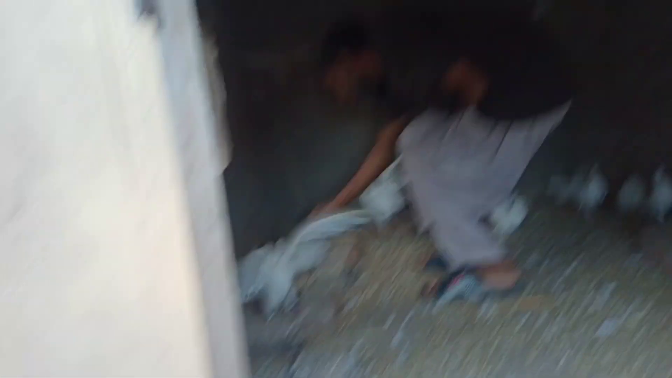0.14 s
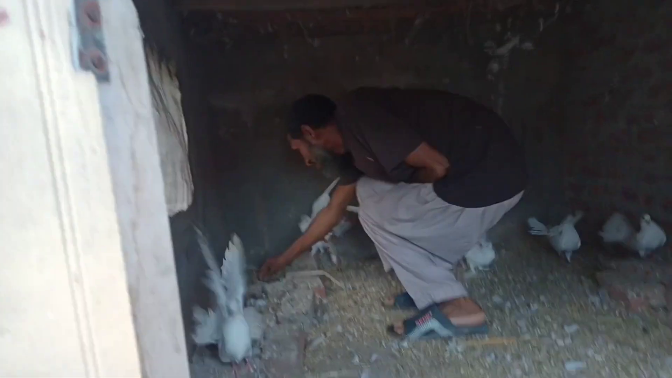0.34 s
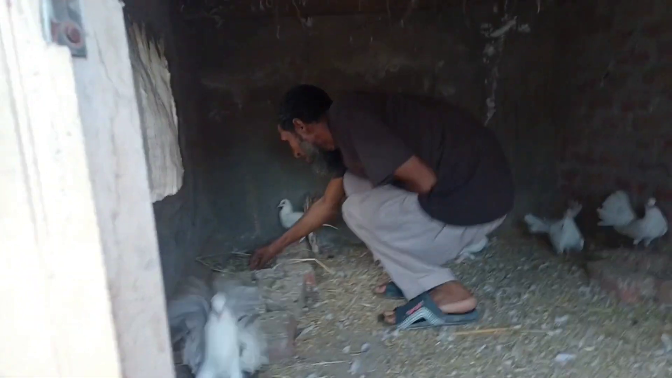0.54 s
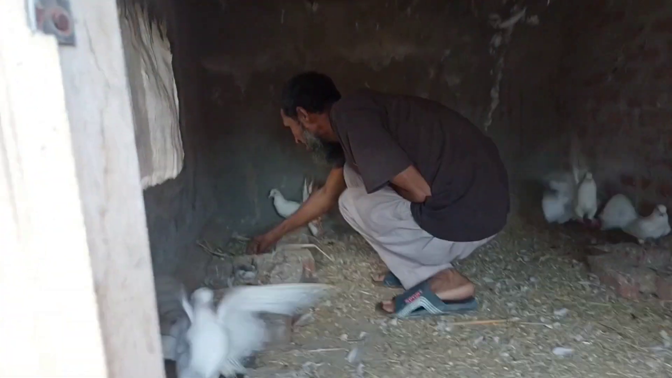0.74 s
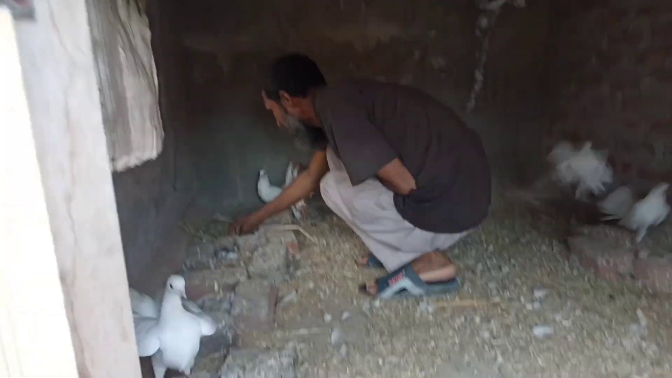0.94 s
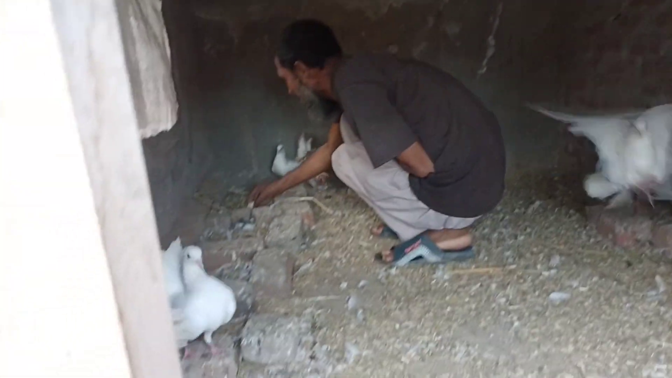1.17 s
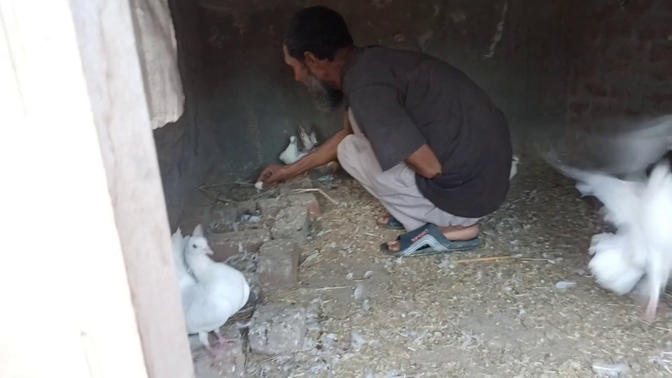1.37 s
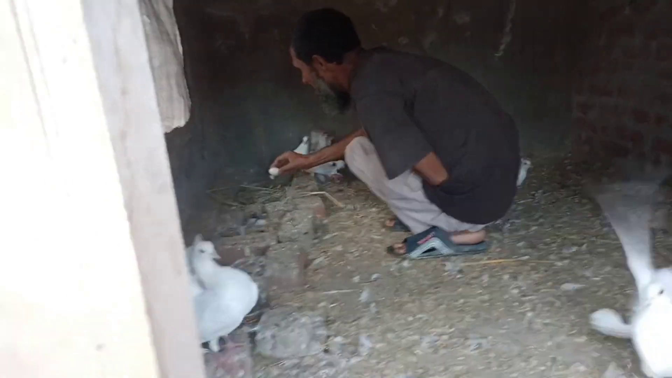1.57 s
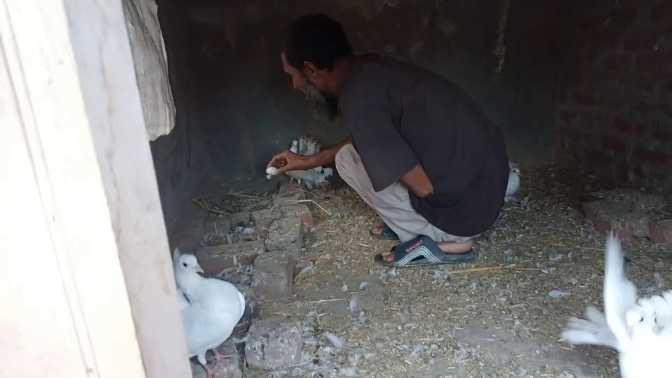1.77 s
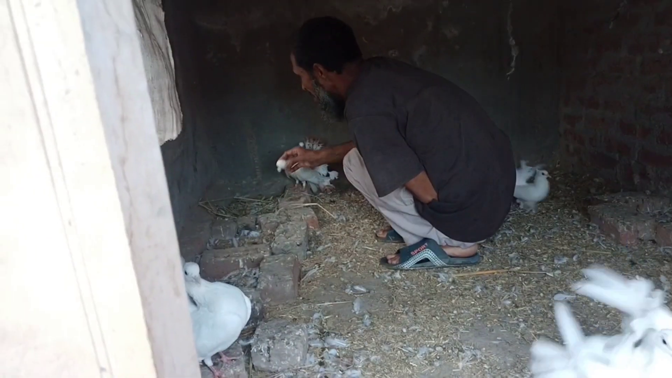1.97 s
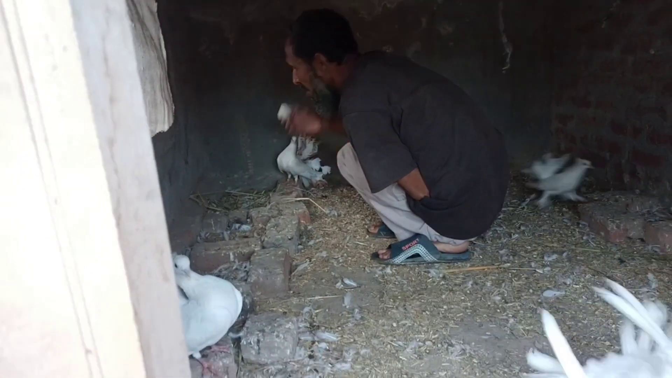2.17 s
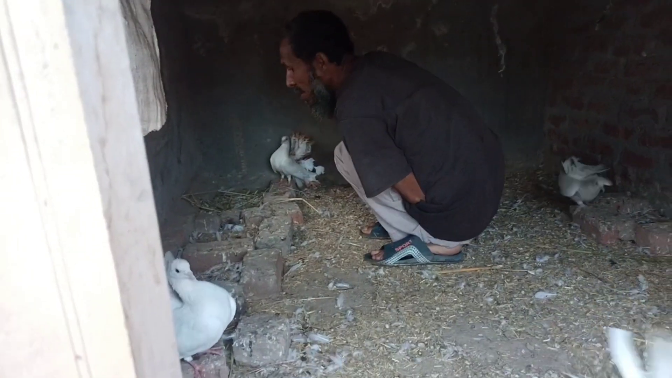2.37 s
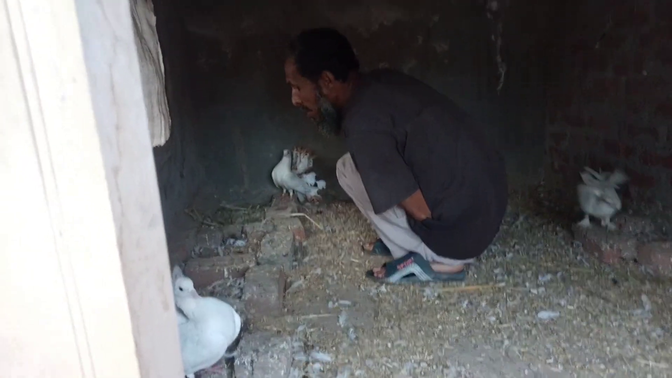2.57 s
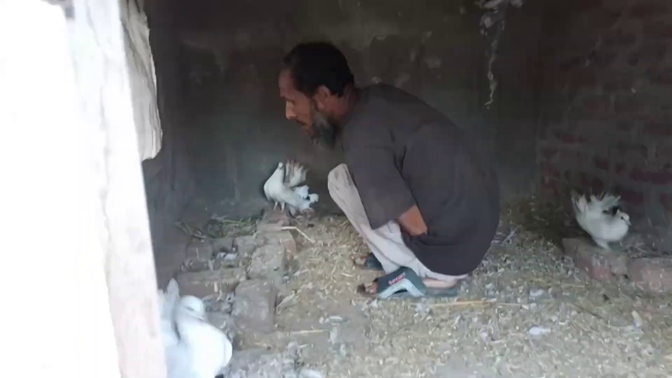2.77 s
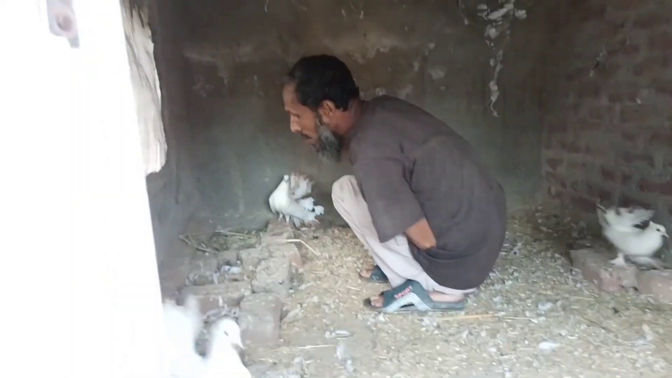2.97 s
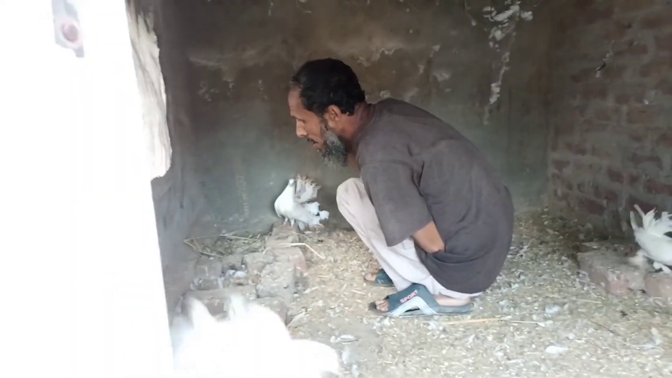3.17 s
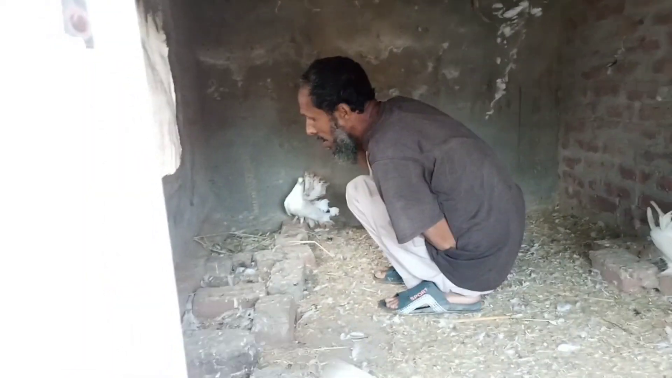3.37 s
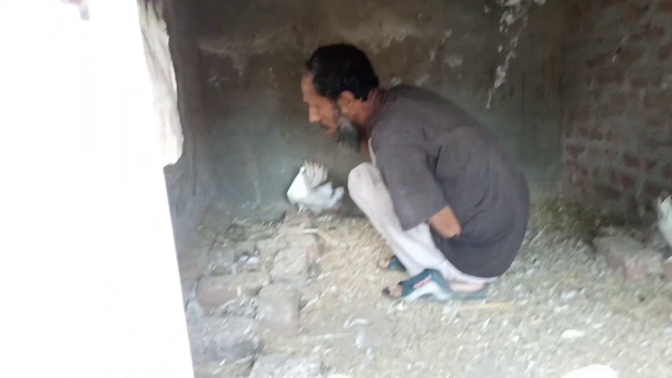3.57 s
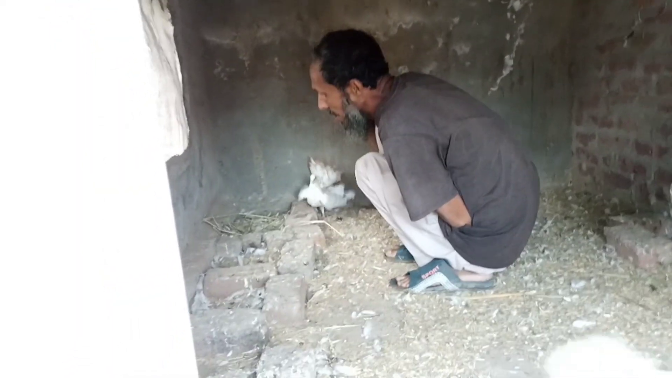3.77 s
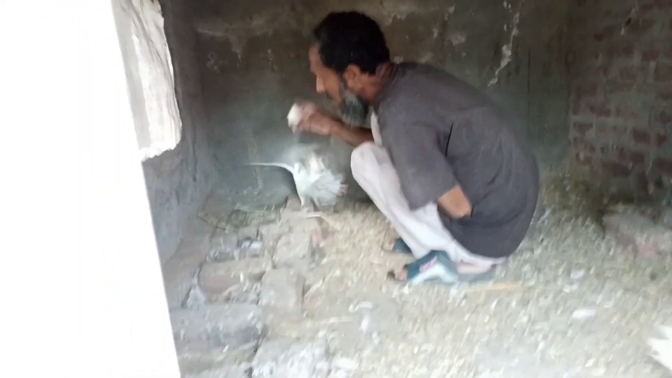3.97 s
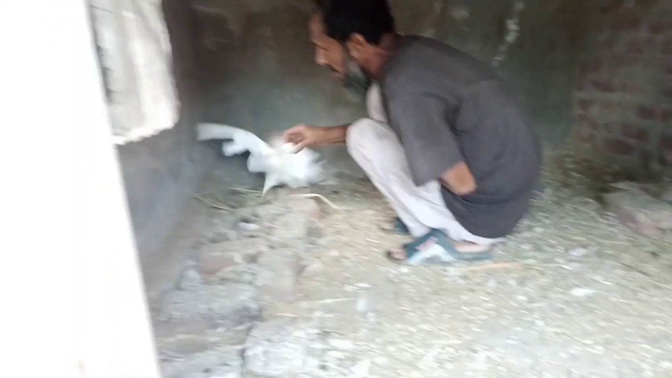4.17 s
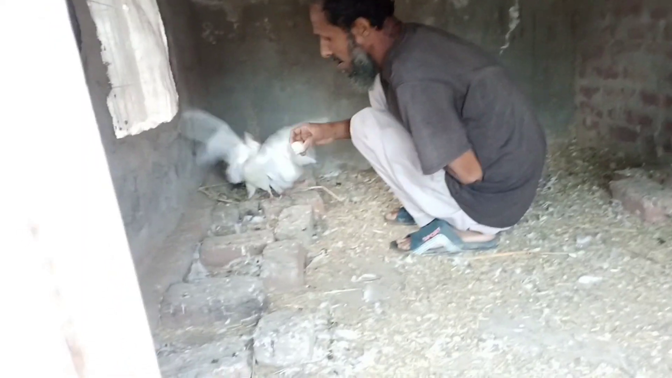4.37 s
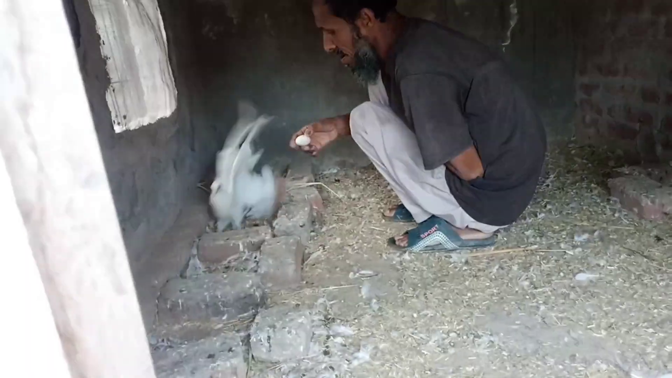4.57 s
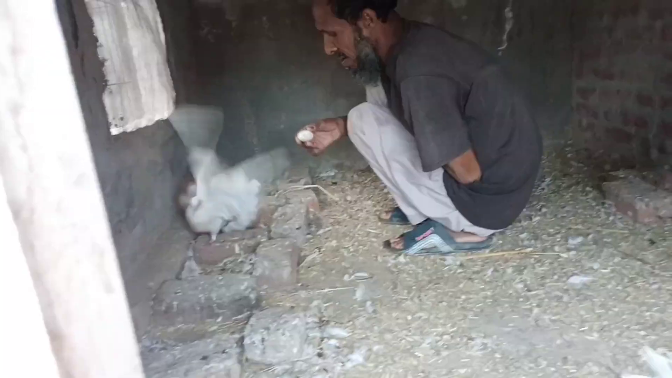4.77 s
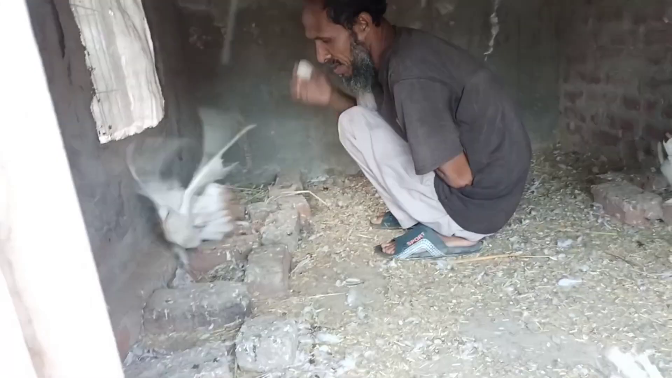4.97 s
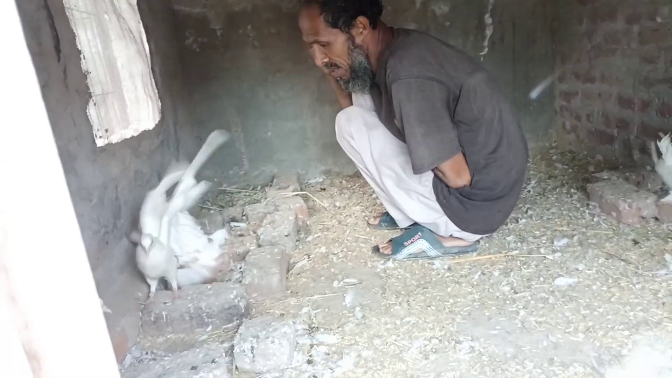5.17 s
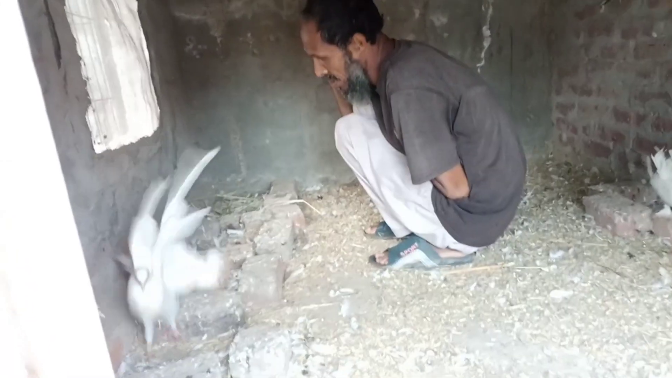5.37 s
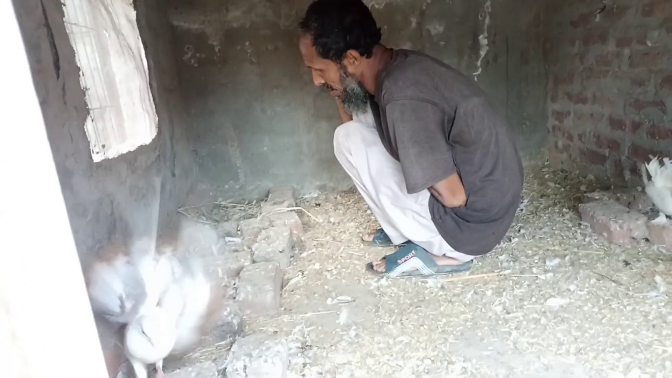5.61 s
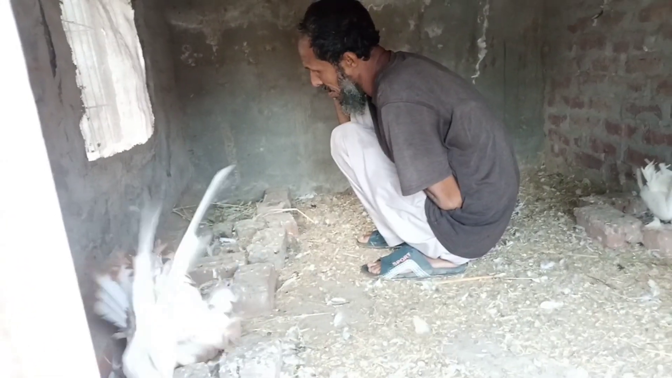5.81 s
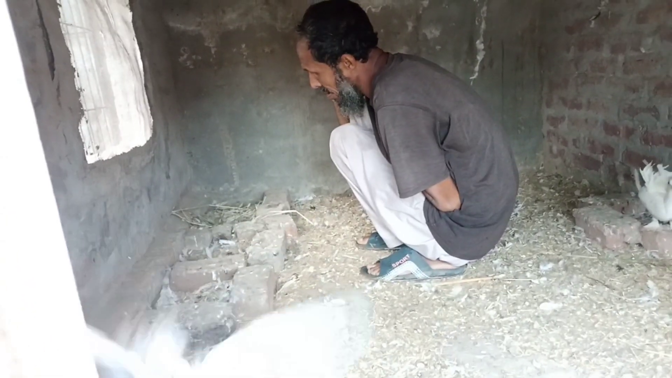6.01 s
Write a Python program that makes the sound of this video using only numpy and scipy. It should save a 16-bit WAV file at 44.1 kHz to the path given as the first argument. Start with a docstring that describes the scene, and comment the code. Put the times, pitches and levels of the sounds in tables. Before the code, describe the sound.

In a small brick coop, a handheld microphone bumps and catches puffs of air as pigeons scatter over dry litter. Sharp wing claps and a dense flurry of swishing strokes come first, then it quiets to soft clucks and thin falling peeps. A rooster crows once, hoarse syllables opening into a long clear note, before more brief wing flaps and peeping.

```python
"""Soft bumps and puffs of air on a hand-held microphone open over rustling litter in a small brick coop.
Pigeons scatter: wings clap and swish (shaped noise and gliding whoops) while fowl cluck (falling harmonics).
Chicks peep in falling, quivering whistles, some with a break in pitch.
A rooster outside crows once: hoarse two-voiced syllables, then a long clear note of separate harmonics."""
import sys
import numpy as np
from scipy import signal
from scipy.fft import rfft, irfft, next_fast_len
from scipy.io import wavfile
from scipy.ndimage import map_coordinates

SR = 44100
rng = np.random.default_rng(int(sys.argv[2]) if len(sys.argv) > 2 else 0)


def wrap_up_sound(samples):
    """Save the sound to the file named by the first command line argument, as 16-bit audio."""
    columns = np.atleast_2d(samples).T
    # keep every value between -1 and 1, then stretch to whole-number steps
    tamed = np.clip(columns, -1, 1)
    steps = np.round(tamed * 32767).astype(np.int16)
    wavfile.write(sys.argv[1], SR, steps)


N = 266628

# Spectrum of moving air: freq_hz, relative_density_db
AIR_SPECTRUM = [(15, -69), (25, -85), (65, 2), (124, 2), (183, 5.5), (267, -8.5), (348, -6.5), (452, -18.5),
                (500, -16.5), (650, -30), (1100, -120)]
# Spectrum of a clap or quill flick: freq_hz, relative_db
CLAP_SPECTRUM = [(150, -27), (600, -10), (1800, -11.5), (3200, -8.5), (4500, -5), (7000, 1), (9000, -3.5),
                 (10500, -15), (13000, -20.5), (15500, -13)]


def amp(db):
    """Decibels to gain."""
    return 10 ** (np.asarray(db) / 20)


def unit(x):
    """Scale to rms 1."""
    return x / np.sqrt(np.mean(x ** 2) + 1e-20)


def clock():
    """The time of every sample, in s."""
    return np.arange(N) / SR


def along(points, hz):
    """Read (Hz, value) points on a log-frequency axis."""
    f, v = np.transpose(points)
    return np.interp(np.log(hz + 1), np.log(f + 1), v)


def curves(rows):
    """One value per sample for each column after the time."""
    s, *cols = np.transpose(rows)
    return [np.interp(clock(), s, c) for c in cols]


def during(rows, fade_s):
    """A linear-edged gate over the span of a table."""
    t = clock()
    return np.clip(np.minimum(t - rows[0][0], rows[-1][0] - t) / fade_s, 0, 1)


def hump(s, half_s):
    """A Gaussian swell of height 1 around s."""
    return np.exp(-np.minimum(((clock() - s) / half_s) ** 2, 50))


def wobble(knots_per_s):
    """A smooth random curve through normally distributed knots."""
    knots = rng.standard_normal(int(N * knots_per_s / SR) + 4)
    return map_coordinates(knots, [np.arange(N) * knots_per_s / SR])


def filtered(x, response):
    """Multiply the spectrum of x by a function of frequency."""
    size = next_fast_len(N + SR // 2)
    return irfft(rfft(x, size) * response(np.fft.rfftfreq(size, 1 / SR)), size)[:N]


def noise(spectrum, grain_db=0):
    """Coloured noise of rms 1, clumped into tiny grains."""
    white = rng.standard_normal(N) * amp(grain_db * wobble(700))
    return unit(filtered(white, lambda hz: amp(along(spectrum, hz))))


def ring(x, spectrum, size=2048):
    """Pass x through a minimum-phase colour of unit energy."""
    cepstrum = irfft(np.log(amp(along(spectrum, np.fft.rfftfreq(size, 1 / SR)))))
    # fold the cepstrum forward to make the response causal
    cepstrum[1:size // 2] *= 2
    cepstrum[size // 2 + 1:] = 0
    response = irfft(np.exp(rfft(cepstrum)))
    return signal.fftconvolve(x, response / np.linalg.norm(response))[:N]


def coop(x, wet_db, linger=0.9):
    """Add the dense decaying echo of close brick walls, normalised for total power."""
    # Decay of the walls at linger 1: freq_hz, t60_s
    wall_decay = [(150, 0.25), (800, 0.32), (3500, 0.25), (8000, 0.23), (15000, 0.039)]
    hz, t, z = signal.stft(rng.standard_normal(SR // 2), SR, nperseg=256)
    t60_s = linger * along(wall_decay, hz)[:, None]
    tail = signal.istft(z * amp(-60 * t / t60_s), SR, nperseg=256)[1]
    tail[:SR // 300] = 0  # delay before the first echo
    echo = signal.fftconvolve(x, tail / np.linalg.norm(tail))[:N]
    return (x + amp(wet_db) * echo) / np.sqrt(1 + amp(wet_db) ** 2)


def stack(pitch_hz, tones):
    """Harmonics on a moving pitch, rms 1."""
    phase = 2 * np.pi * np.cumsum(pitch_hz) / SR
    return unit(sum(amp(db) * np.sin(round(k) * phase) for k, db in tones))


def yard():
    """The steady outdoor background: coloured noise with a slow drift in level."""
    # Spectrum: freq_hz, relative_density_db
    yard_spectrum = [(24, -49), (40, -24), (182, -37), (321, -39), (364, -24), (443, -46), (643, 5.5),
                     (866, 3), (1030, -67), (1110, -7), (1350, -9), (2920, -8.5), (4680, -13), (6950, -25),
                     (15000, -70)]
    return amp(-62 + 1.5 * wobble(6)) * noise(yard_spectrum)


def murmur():
    """Distant fowl, merged by the yard into noise of swinging level."""
    # Spectrum: freq_hz, relative_density_db
    murmur_spectrum = [(300, -45), (520, -19), (640, -1), (780, 5), (900, -19), (1100, -26), (1450, -9),
                       (1950, 0.5), (2600, -7.5), (4000, -52)]
    return amp(-63.5 + 4 * wobble(13)) * noise(murmur_spectrum)


def stirring():
    """Birds shuffle over dry litter and stir the air: noise bands in small spurts and longer scrapes."""
    # Background bustle: time_s, bass_db, low_middle_db
    bustle = [(0.0, -43, -55), (0.15, -41.5, -50), (0.42, -47.5, -72), (0.66, -56, -56.5),
              (0.88, -48.5, -44), (1.04, -43, -50.5), (1.33, -45, -41), (1.45, -46, -46),
              (1.58, -50, -55.5), (1.85, -64.5, -54), (2.24, -54.5, -50.5), (2.63, -57.5, -61.5),
              (3.65, -57, -60), (3.94, -62, -69.5), (4.6, -47, -53.5), (5.17, -56.5, -61.5),
              (5.59, -48.5, -57.5), (6.05, -56.5, -62)]
    # Rustle of litter and feathers: time_s, treble_db
    rustle = [(0.0, -46), (0.45, -57), (0.69, -49), (1.03, -43.5), (1.35, -43), (1.6, -49), (1.8, -54.5),
              (2.27, -52.5), (2.96, -67.5), (3.17, -61), (3.43, -55), (3.85, -57), (3.99, -50), (4.71, -47),
              (5.2, -51), (5.55, -44), (5.65, -43), (5.79, -53.5), (6.05, -54)]
    # Single scrapes of feet on the floor: middle_s, scuffle_db, litter_db, half_length_s
    scrapes = [(0.008, -43.5, -54, 0.041), (0.214, -61, -70, 0.028), (0.423, -63, -53.5, 0.088),
               (0.97, -39, -45, 0.032), (1.78, -59, -67, 0.052), (2.02, -54.5, -59, 0.034),
               (2.19, -52, -61, 0.05), (2.306, -44.5, -70, 0.018), (2.611, -48.5, -61, 0.015),
               (2.928, -56.5, -71, 0.043), (3.257, -53.5, -64, 0.021), (3.304, -67, -51, 0.049),
               (4.644, -76, -42, 0.018), (5.193, -53, -55, 0.038), (5.335, -45.5, -42.5, 0.0025),
               (5.465, -48, -63, 0.021), (5.546, -42, -59, 0.03)]
    # Spectra: freq_hz, relative_density_db
    scuffle_spectrum = [(120, -3.5), (200, -3), (339, 2.5), (518, -2), (559, 0), (650, -2.5), (1090, -9),
                        (1400, -6.5), (2480, -12), (4000, -17), (5200, -24), (8800, -120)]
    litter_spectrum = [(1180, -8), (2000, -2.5), (2460, -7.5), (3190, -5.5), (4280, -2.5), (6830, 0),
                       (9080, -3.5), (12100, -21.5), (13500, -13.5), (14900, -27), (15800, 0.5)]
    scuffle_offset_db, litter_offset_db = -0.5, 2
    rumble_hz, rumble_from_db, rumble_db_per_bass_db = 97, -50, 0.92

    bass_db, middle_db = curves(bustle)
    treble_db, = curves(rustle)
    scuffle = amp(middle_db + scuffle_offset_db)
    litter = amp(treble_db + litter_offset_db)
    for s, scuffle_db, litter_db, half_s in scrapes:
        swell = hump(s, half_s)
        scuffle = scuffle + amp(scuffle_db) * swell
        litter = litter + amp(litter_db) * swell

    # stronger draughts reach deeper
    air = noise(AIR_SPECTRUM)
    rumble = filtered(air, lambda hz: 1 / (1 + (hz / rumble_hz) ** 8))
    air = air - rumble + rumble * amp(rumble_db_per_bass_db * (bass_db - rumble_from_db))
    air = amp(bass_db + 1.4 * wobble(23)) * air

    spurts = 1.4 * np.tanh(wobble(45) / 1.4)
    scuffle = scuffle * amp(1.8 * spurts) * noise(scuffle_spectrum, grain_db=2)
    litter = litter * amp(4.05 * spurts) * noise(litter_spectrum, grain_db=1.5)
    return air + scuffle + litter


def bumps():
    """Microphone bumps: heavily damped sines in puffs of air; the deep ones bring a slower heave."""
    # Bumps: start_s, knock_scale_db, pitch_hz, puff_db
    bump_rows = [(0.001, -16, 188, -27), (0.02, -8, 307, -43), (0.028, -14.5, 530, -55),
                 (0.105, -18, 140, -47), (0.2, -33, 123, -28.5), (0.224, -18, 116, -31),
                 (0.241, -26, 200, -27.5), (0.289, -21, 160, -33), (0.401, -16.5, 131, -43),
                 (0.547, -25, 130, -56), (0.6, -14.5, 122, -42), (0.852, -18, 274, -55),
                 (0.95, -15, 160, -44), (1.164, -21.5, 210, -46), (1.27, -21, 240, -51),
                 (1.33, -20, 230, -44), (1.385, -13, 237, -49), (1.777, -25, 124, -34.5),
                 (2.307, -13, 383, -56), (3.147, -28.5, 202, -66), (4.672, -30, 99, -36.5),
                 (4.713, -30, 112, -46), (5.708, -17.5, 159, -47), (5.994, -35, 142, -54)]
    puff_lag_s, puff_half_s = 0.0073, 0.012
    t = np.arange(SR // 5) / SR
    out, puffs = np.zeros(N + SR), np.zeros(N)
    heave = np.sin(2 * np.pi * 78 * t) * np.exp(-t / 0.026) * (1 - np.exp(-t / 0.045))
    for s, db, hz, puff_db in bump_rows:
        cycles = hz * t
        knock = np.sin(2 * np.pi * cycles) * np.exp(-cycles / 0.85) * (1 - np.exp(-cycles))
        depth = 1 / (1 + (hz / 200) ** 4)
        out[round(s * SR):][:len(t)] += amp(db) * (knock + amp(-8) * depth * heave)
        puffs += amp(puff_db) * hump(s + puff_lag_s, puff_half_s)
    return coop(out[:N], wet_db=-7) + puffs * noise(AIR_SPECTRUM)


def claps():
    """Wing tips slap together: a crack, a spray of quills and a bounce off the nearest wall."""
    # Claps and feather flicks: start_s, relative_level_db, quill_spray_t60_s
    clap_rows = [(0.0315, -30, 0.032), (0.0898, -25, 0.021), (0.7497, -31, 0.022), (0.7934, -25, .04),
                 (0.8661, -10.5, 0.041), (0.972, -18, 0.028), (1.0084, -29, .03), (1.0291, -18.5, 0.014),
                 (1.034, -16.5, 0.022), (1.1347, -11.5, 0.016), (1.1812, -20.5, 0.024),
                 (1.2481, -24, 0.014), (1.28, -24, .02), (1.351, -21, 0.027), (1.377, -30, .02),
                 (1.448, -33, .015), (1.5369, -30, .02), (1.965, -35, 0.016), (3.227, -42, 0.014),
                 (3.411, -29, 0.015), (4.355, -32, .04), (4.434, -28, .037), (4.568, -16.5, 0.051),
                 (4.9914, -22, 0.032), (5.093, -11.5, 0.034), (5.525, -17.5, 0.026), (5.543, -15.5, 0.043),
                 (5.551, -20, 0.029), (5.558, -20, 0.039), (5.6842, -23.5, 0.029), (5.828, -31.5, 0.041)]
    t = np.arange(SR // 5) / SR
    cracks = np.zeros(N + SR)
    for s, db, t60_s in clap_rows:
        bounce_s = rng.uniform(.0055, .007)
        spray = amp(-60 * t / t60_s)
        crack = 0.85 * amp(-60 * t / 0.0054)
        bounce = amp(-60 * bounce_s / t60_s) * np.exp(-((t - bounce_s) / 0.002) ** 2)
        shape = (spray + crack + bounce) * (1 - np.exp(-t / 0.00042))
        cracks[round(s * SR):][:len(t)] += amp(db - 7) * shape * rng.standard_normal(len(t))
    return coop(ring(cracks[:N], CLAP_SPECTRUM), wet_db=-8)


def far_fowl():
    """Fowl in and around the coop: soft quivering harmonic clucks, each falling a little."""
    # Clucks: middle_s, pitch_hz, level_db, half_length_s
    clucks = [(0.04, 1380, -52, 0.0193), (0.192, 830, -50.5, 0.034), (0.321, 1890, -54, .04),
              (0.773, 864, -44, 0.0085), (1.67, 724, -57, .035), (1.79, 716, -52, .04),
              (1.908, 1517, -50, 0.022), (1.976, 840, -49.5, 0.015), (2.029, 762, -53, 0.045),
              (2.187, 1014, -50, .04), (2.469, 790, -54, .035), (2.902, 900, -56, .02),
              (2.93, 792, -43, 0.0081), (3.02, 676, -51.5, 0.03), (3.06, 900, -58, .02),
              (3.11, 660, -50.5, 0.05), (3.15, 1890, -60.5, .025), (3.335, 688, -52.5, .04),
              (3.485, 616, -44, 0.03), (3.58, 790, -36, 0.033), (3.75, 604, -44, 0.061),
              (4.872, 876, -46, 0.012), (5.059, 826, -36.5, 0.014)]
    # Voice of a cluck: harmonic_multiple, relative_db
    cluck_tones = [(1, 13), (2, -7), (3, -8), (4, -26)]
    calls = np.zeros(N)
    quiver = 1 + 0.022 * wobble(200)
    for s, hz, level_db, half_s in clucks:
        u = np.clip((clock() - s) / half_s, -5, 5)
        calls += amp(level_db - 14 * u ** 2) * stack(hz * quiver * (1 - 0.051 * u), cluck_tones)
    return coop(calls, wet_db=-3.5, linger=0.53)


def peep(course, octave_db, waver, twin_db):
    """A thin quivering whistle along (s, Hz, dB) rows, with a weak octave and a second voice beside it."""
    twin_share = .925  # the second voice runs just under the first
    s, hz, db = np.transpose(course)
    span = np.arange(max(round(s[0] * SR), 0), min(round(s[-1] * SR), N))
    t = span / SR
    knots_s = np.linspace(s[0], s[-1], num=96)
    quiver, flutter = [np.interp(t, knots_s, rng.standard_normal(96)) for _ in range(2)]
    pitch_hz = np.interp(t, s, hz) * (1 + waver * quiver)
    phase = 2 * np.pi * np.cumsum(pitch_hz) / SR
    # the throat lets the octave through only once the pitch has dropped
    dropped = 1 / (1 + (pitch_hz / 3700) ** 12)
    octave = amp(octave_db) * dropped * np.sin(2 * phase)
    # the second voice sounds only while the whistle is high
    high = np.clip((pitch_hz - 4150) / 300, 0, 1)
    twin = amp(twin_db) * high * np.sin(twin_share * phase)
    out = np.zeros(N)
    out[span] = amp(np.interp(t, s, db) + 2.8 * flutter) * (np.sin(phase) + octave + twin)
    return out


def chicks():
    """Chick whistles hang high and then plunge, some with a break; the walls smear them."""
    # Gliding peeps: start_s, end_s, reference_pitch_hz, relative_level_db, fall_slowness_factor
    glides = [(1.294, 1.341, 4590, -39.5, 1), (1.667, 1.861, 4560, -38.5, 0.85),
              (2.417, 2.632, 4620, -42, 1.39), (3.108, 3.269, 4630, -48, 0.93),
              (4.47, 4.638, 4710, -44, 0.88), (4.997, 5.19, 4590, -42, 1.1), (5.27, 5.398, 4620, -39, 0.95),
              (5.556, 5.708, 4510, -38, 0.69), (5.617, 5.782, 4600, -48.5, 0.97),
              (5.97, 6.178, 4580, -36, 0.99)]
    # Gliding peep's course at slowness 1: before_end_s, share_of_reference_pitch, relative_db
    glide_course = [(0, .555, -12), (.006, .6, -1.5), (.018, .705, 0), (.036, .765, -7), (.047, .83, -13),
                    (.075, .89, -13), (.115, .985, -15), (.21, 1.03, -18)]
    # Peeps that break downward: break_s, lead_length_s, rising_share_of_lead, fall_length_s,
    # top_pitch_hz, break_pitch_hz, relative_level_db
    breaks = [(0.405, .12, 0.048, 0.06, 4750, 3960, -45), (1.756, 0.15, 0.046, 0.041, 4660, 3620, -43),
              (2.376, 0.16, 0.2, 0.079, 4900, 4167, -43.5), (2.73, .145, 0.45, .046, 5056, 4036, -32),
              (3.304, .152, 0.08, 0.057, 4910, 4110, -38)]
    break_share, break_length_s, peep_end_hz = .84, 0.0093, 2660
    shelf_share, shelf_s, crest_hold_s = 1.07, .036, 0.01774
    fade_share = 0.77  # the faster dying away starts at this share of the fall
    smear_from_hz = 3900

    gliding, breaking = np.zeros(N), np.zeros(N)
    for start, end, ref_hz, db, slowness in glides:
        course = [(end - slowness * before, ref_hz * share, db + swell_db)
                  for before, share, swell_db in glide_course[::-1]]
        fade_in = np.clip((clock() - start) / 0.018, 0, 1)
        gliding += peep(course, octave_db=-21, waver=0.011, twin_db=-3) * fade_in

    # a breaking peep rests on its crest, then descends to a shelf before it breaks
    for snap, lead, rising, fall, top_hz, break_hz, db in breaks:
        start, end = snap - lead, snap + fall
        crest = start + rising * lead
        dropped_hz = break_share * break_hz
        fade_hz = dropped_hz + fade_share * (peep_end_hz - dropped_hz)
        course = [(start, (1 - 0.15 * rising) * top_hz, db - 15),
                  (crest, top_hz, db - 9),
                  (crest + crest_hold_s, top_hz, db - 12.5),
                  (snap - shelf_s, shelf_share * break_hz, db - 3.5),
                  (snap, break_hz, db - 3),
                  (snap + break_length_s, dropped_hz, db),
                  (snap + fade_share * fall, fade_hz, db - 4),
                  (end, peep_end_hz, db - 12)]
        breaking += peep(course, octave_db=-14, waver=0.0123, twin_db=-18) * during(course, fade_s=0.0048)

    # the held top of a gliding peep builds up between the walls more than its quick plunge
    top = filtered(gliding, lambda hz: 1 - 1 / (1 + (hz / smear_from_hz) ** 24))
    gliding = coop(gliding - top, wet_db=-6, linger=1) + coop(.85 * top, wet_db=3, linger=1.2)
    breaking = coop(breaking, wet_db=-2.5, linger=1)
    return amp(5) * gliding + amp(1.5) * breaking


def strokes():
    """Wing strokes rise quickly and die away a little more slowly: pushed air, a falling whoop, snapping feathers."""
    # Strokes: fastest_s, air_db, relative_feather_db, half_length_s, whoop_hz, whoop_db
    flaps = [(0.667, -43.5, -37.5, 0.019, 720, -74), (0.807, -37.5, -24.5, 0.011, 760, -37.5),
             (0.87, -36, -45, 0.01, 600, -36.5), (0.914, -35, -33, .012, 630, -29),
             (0.963, -35.5, -41, 0.0086, 520, -32.5), (1.013, -30, -33, .011, 790, -24.5),
             (1.032, -28, -19, 0.0058, 650, -35), (1.053, -36, -28, 0.0062, 720, -52),
             (1.118, -36, -40, 0.016, 900, -36), (1.163, -38, -31, 0.024, 820, -38.5),
             (1.219, -33, -48, .008, 680, -30.5), (1.249, -34, -44, .011, 680, -46),
             (1.272, -36.5, -38, 0.014, 650, -40), (1.33, -31, -30.5, 0.017, 650, -31.5),
             (1.384, -36, -32.5, 0.022, 650, -36), (1.43, -31.5, -30.5, 0.0086, 660, -36),
             (1.444, -38, -39, 0.0099, 690, -31), (1.486, -36.5, -35.5, 0.018, 680, -38),
             (1.549, -37, -40, 0.016, 680, -37), (1.595, -44, -40, 0.018, 700, -53),
             (2.261, -35, -48, 0.0096, 720, -54), (2.353, -39, -55, 0.0082, 800, -41.5),
             (4.586, -36.5, -18.5, 0.0089, 720, -39), (4.794, -64, -27, 0.014, 720, -62),
             (5.557, -38, -28, 0.0071, 900, -57), (5.636, -67, -33.5, 0.018, 720, -69)]
    # Spectra: freq_hz, relative_density_db
    swish_spectrum = [(71, -37), (120, -6), (186, -37), (236, 10.5), (335, -4.5), (505, 0.5), (719, -1),
                      (1070, -4), (1410, -2), (2130, -8.5), (4000, -8.5), (5200, -17), (8800, -120)]
    feather_spectrum = [(1180, -38), (2000, -14.5), (5310, 1), (5690, 4.5), (6710, 4), (9010, -7.5),
                        (10300, -17), (11200, -10.5), (13100, -25), (14900, -6), (15800, -18)]
    quills_per_s, quill_db = 650, -8

    t = clock()
    air, feathers, whoop = np.zeros(N), np.zeros(N), np.zeros(N)
    eddies = 1 + 0.1343 * wobble(500)
    for s, air_db, feather_db, half_s, whoop_hz, whoop_db in flaps:
        near = np.abs(t - s) < .08
        u = (t[near] - s) / half_s
        width, power = np.where(u < 0, .9, 1.05), np.where(u < 0, 2.4, 1.4)
        swell = np.exp(-np.abs(u / width) ** power)
        air[near] += amp(air_db) * swell
        feathers[near] += amp(feather_db - 8.5) * swell
        # eddies shed from the wing's edge drop in pitch as it slows
        shed_hz = whoop_hz * (1 - 0.0604 * np.tanh(u)) * eddies[near]
        whoop[near] += amp(whoop_db) * swell * np.sin(2 * np.pi * np.cumsum(shed_hz) / SR)

    push = air * noise(swish_spectrum, grain_db=3)
    # single quills flick past each other all through the stroke
    ticks = (rng.random(N) < quills_per_s / SR) * rng.uniform(-1.3, 1, N)
    quills = amp(quill_db) * (feathers + air / 3) * unit(ring(ticks, CLAP_SPECTRUM))
    snapping = feathers * noise(feather_spectrum, grain_db=3.5)
    return coop(whoop + push + snapping + quills, wet_db=-10.5)


def syrinx(pitch_hz, rough, low_db, high_db, tones, nulls=()):
    """The rooster's main voice as (fundamental, overtones and rasp); roughness shakes its pitch and level."""
    # Hoarse air in the throat: freq_hz, relative_density_db
    rasp_spectrum = [(410, -52), (700, -26), (804, -3), (905, -1), (1060, 5), (1250, 1), (1430, -10),
                     (1700, 7), (1900, 6.5), (2170, -1), (2550, -7), (2800, -29), (3330, -3), (3800, -11),
                     (4400, -22), (5000, -13), (5500, -13), (6000, 1), (6450, -19), (7100, -14),
                     (9000, -14), (11700, -56), (19800, -120)]
    swell_db, swells_per_s = 3, 20
    flicker_db, flickers_per_s = 2.4, 55

    rough = np.clip(rough, 0, 1)
    jitter = .016 * rough * wobble(300) + .011 * rough ** 2 * wobble(55) + .0012 * wobble(60)
    pitch_hz = pitch_hz * (1 + jitter)
    shake = amp(3.17 * rough * wobble(380) - 2 * rough)
    fundamental = stack(pitch_hz, [(1, 0)])
    phase = 2 * np.pi * np.cumsum(pitch_hz) / SR
    overtones = np.zeros(N)
    for k, db in tones:
        lost_db = sum(depth_db * hump(s, half_s) for multiple, s, half_s, depth_db in nulls
                      if round(multiple) == round(k))
        drift_db = swell_db * wobble(swells_per_s) + flicker_db * wobble(flickers_per_s)
        overtones += amp(db - 3 - lost_db + drift_db) * np.sin(round(k) * phase)
    high = amp(high_db - 7 * rough) * overtones
    # air escapes in one rough puff per cycle
    puffing = unit(noise(rasp_spectrum, grain_db=2.5) * (1 + .5 * fundamental))
    rasp = amp(high_db - 6.5) * rough ** 2 * puffing
    return shake * np.array([amp(low_db) * fundamental, high + rasp])


def syllable(start, clear_s, hoarse_s, hz, scoop, low_db, high_db, second_hz, second_db):
    """The pitch scoops up; a second voice breaks in, the fundamental gives way and the sound turns hoarse and tires."""
    # Overtones of the main voice: harmonic_multiple, relative_db
    hoarse_tones = [(2, -3), (3, -5.5), (4, -9.5), (5, -30), (6, -13.5), (7, -11.5), (8, -14), (9, -7.5),
                    (11, -22)]
    # Second voice of the syrinx: harmonic_multiple, relative_db
    second_tones = [(1, -1.5), (2, -1), (3, -18.5), (4, -39), (5, -19.5), (6, -13), (7, -15)]
    attack_s, release_s = 0.034, 0.25  # time per 30 dB of rise or fall
    scoop_s, sag_hz_per_s = .055, 110
    clear_rough, broken_rough = 0.384, 1  # roughness 0-1
    gives_way_db = 5
    warble_share, warbles_per_s = .007, 70

    t, snap, end = clock(), start + clear_s, start + clear_s + hoarse_s
    age = np.clip(t - start, 0, 1)
    broken = np.interp(t, [snap - .04, snap], [0, 1])
    tired = np.clip((t - snap) / (end - snap), 0, 1)
    before = np.maximum(start + attack_s / 2 - t, 0) / attack_s
    after = np.maximum(t - end, 0) / release_s
    gate = amp(-30 * (before + after))
    pitch_hz = hz * (1 - scoop * np.exp(-age / scoop_s)) - sag_hz_per_s * age
    rough = clear_rough + (broken_rough - clear_rough) * broken
    low_db = low_db - gives_way_db * broken - 6 * tired
    high_db = high_db - 4.6 * (1 - broken) - 5 * tired
    low, high = syrinx(pitch_hz, rough, low_db, high_db, hoarse_tones)
    warble = .014 * wobble(380) + warble_share * wobble(warbles_per_s)
    second = stack(second_hz * (1 + warble), second_tones)
    second = second * amp(second_db - 2.5 - 20 * (1 - broken) - 8 * tired + 5.5 * wobble(330))
    return gate * np.array([low, high + second])


def rooster():
    """A few hoarse syllables, then one voice of the syrinx holds a clear, slowly sinking note."""
    # Opening syllables: start_s, clear_length_s, hoarse_length_s, pitch_hz, scoop_share,
    # fundamental_db, overtone_db, second_voice_hz, second_voice_db (levels before roughness and tiring)
    syllables = [(3.463, 0.088, 0.15, 814, 0.17, -38, -39.5, 1237, -51),
                 (3.774, 0.054, 0.11, 841, 0.057, -29.5, -34, 1020, -33),
                 (3.931, 0.073, 0.061, 826, .03, -31, -32.5, 1009, -31),
                 (4.053, 0.011, 0.13, 835, 0.018, -40.5, -36, 986, -36)]
    # Long note's pitch: time_s, pitch_hz
    held_pitch = [(4.16, 785), (4.24, 799), (4.45, 788), (4.6, 789), (4.8, 772), (4.881, 767), (4.95, 755),
                  (5.03, 747), (5.14, 743)]
    # Long note's level before roughness: time_s, fundamental_db, overtone_db
    held_level = [(4.13, -30, -40), (4.2, -35, -35.5), (4.265, -29.5, -37), (4.315, -34.5, -37.5),
                  (4.38, -29.5, -39), (4.46, -30.5, -38), (4.528, -43, -32.5), (4.584, -29.5, -39.5),
                  (4.64, -29.5, -37.5), (4.718, -26.7, -34.5), (4.774, -31, -34.5), (4.845, -34.5, -35.5),
                  (4.894, -30.5, -33.5), (4.94, -41.5, -36.5), (4.978, -27.5, -39.5), (5.03, -31, -36),
                  (5.08, -39, -41), (5.14, -48, -45)]
    # Long note's overtones: harmonic_multiple, relative_db
    held_tones = [(2, -1.5), (3, 0.5), (4, -9.5), (5, -24), (6, -8), (7, -11.5), (8, -20), (9, -7),
                  (10, -35), (11, -31), (12, -24)]
    # Where the walls' reflection cancels an overtone of the sinking note:
    # harmonic_multiple, middle_s, half_length_s, depth_db
    wall_nulls = [(2, 4.52, 0.039, 9), (2, 4.625, 0.032, 14), (2, 4.83, 0.014, 6), (3, 4.285, 0.033, 14.5),
                  (3, 4.51, 0.031, 18), (3, 4.6, 0.03, 15), (3, 4.86, 0.066, 20), (3, 5.015, 0.014, 27),
                  (4, 4.52, 0.041, 22), (6, 4.35, 0.29, 20), (6, 4.83, 0.045, 10), (7, 4.68, 0.058, 21),
                  (7, 5.01, 0.091, 14), (9, 4.67, .04, 2)]
    clears_s, held_rough = 0.15, 0.049

    pitch_hz, = curves(held_pitch)
    low_db, high_db = curves(held_level)
    # the long note sheds its hoarseness
    rough = np.interp(clock() - held_pitch[0][0], [0, clears_s], [1, held_rough])
    note = syrinx(pitch_hz, rough, low_db, high_db, held_tones, wall_nulls)
    note_low, note_high = note * during(held_level, fade_s=0.071)
    low, high = sum(syllable(*row) for row in syllables)
    # the fundamentals and the long note stay direct, the syllables' overtones get coop echo;
    # a faint longer echo of everything lies under them
    echo = amp(-17) * coop(low + high + .8 * note_low + 2 * note_high, wet_db=30, linger=3.4)
    return low + note_low + note_high + coop(high, wet_db=1, linger=0.73) + echo


def scene():
    """Everything heard from the doorway, as one channel."""
    background = yard() + murmur() + stirring()
    birds = claps() + far_fowl() + chicks() + strokes() + rooster()
    return (background + bumps() + birds)[None]


def record(dry):
    """The microphone sheds the deepest rumble and keeps nothing above its band limit."""
    top_hz = 15750
    low_cut = signal.butter(2, 48, "highpass", fs=SR, output="sos")
    return np.array([filtered(signal.sosfilt(low_cut, x), lambda hz: hz < top_hz) for x in dry])


dry = scene()
out = record(dry)
wrap_up_sound(out)
```